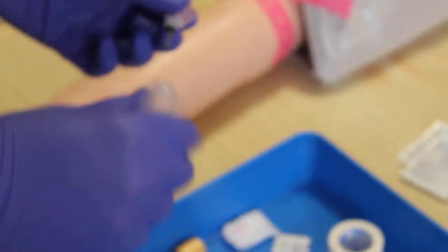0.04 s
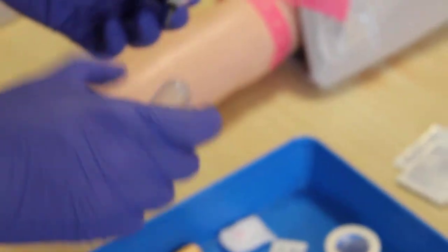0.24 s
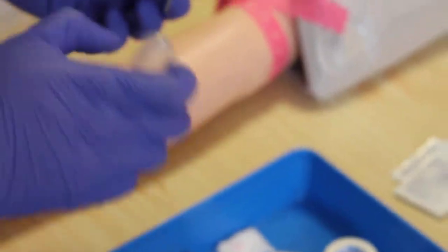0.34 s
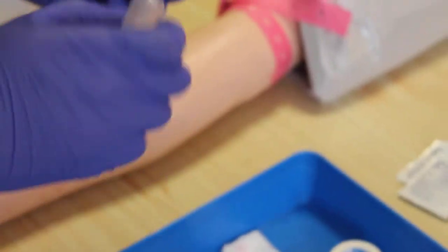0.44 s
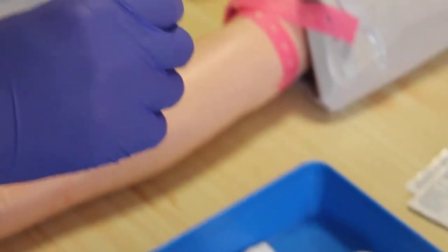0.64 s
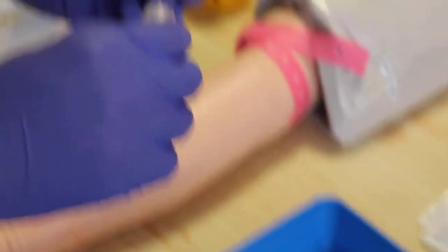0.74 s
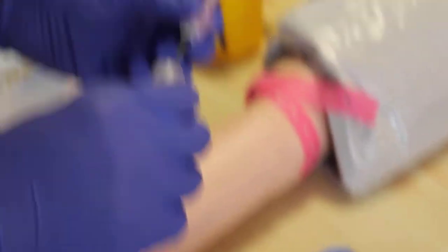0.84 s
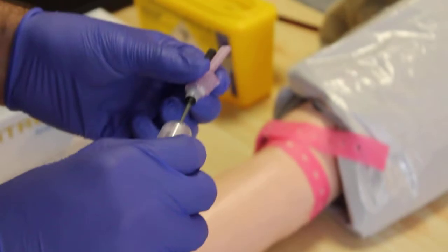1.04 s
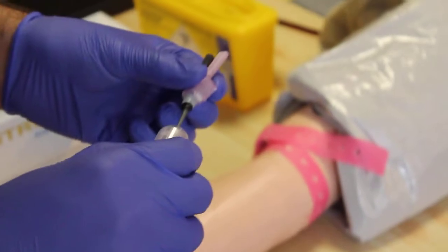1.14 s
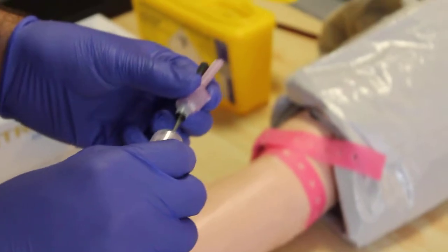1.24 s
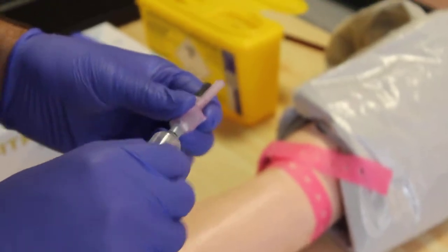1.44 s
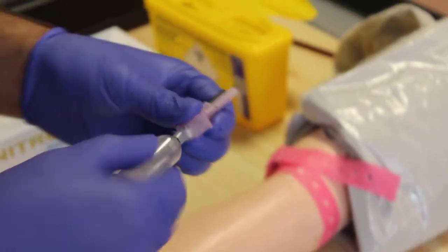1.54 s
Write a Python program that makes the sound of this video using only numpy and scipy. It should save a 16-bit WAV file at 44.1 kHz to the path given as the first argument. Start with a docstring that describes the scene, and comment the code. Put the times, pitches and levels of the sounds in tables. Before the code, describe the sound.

A small plastic needle cap clatters and bounces to rest in a plastic tray indoors

```python
"""Ventilation hums and rushes throughout: steady sine tones over coloured noise.
From 0.23 s a plastic needle cap bounces to rest in a plastic tray, landing on one end and then the other;
each landing is a sharp pulse, fading sine tones and a noisy crack. Faint glove brushes of noise fall among them.
At 1.39 s the needle holder gives a double click, then a fainter one, and its hollow tube rings.
At 1.52 s the glove brushes once more. A small room adds echoes and a soft tail of fading noise."""
import sys
import numpy as np
from scipy import signal
from scipy.fft import rfft, irfft
from scipy.io import wavfile

SR = 44100
rng = np.random.default_rng(int(sys.argv[2]) if len(sys.argv) > 2 else 0)


def master_out(mix):
    """Clip the mix to full scale and print it as 16-bit PCM to the path in sys.argv[1]."""
    frames = np.transpose(np.atleast_2d(mix))
    ceiling = np.clip(frames, -1, 1)
    pcm = np.round(ceiling * 32767).astype(np.int16)
    wavfile.write(sys.argv[1], SR, pcm)


N = 70560   # length in samples: 1.6 s

# Ventilation motor tones: f/Hz, level/dB rms
HUM_TONES = [(100, -80.5), (199.5, -73), (300.5, -69.5), (399.9, -59.5), (500, -70.5)]
# Colour of the rushing air, relative: f/Hz, level/dB per Hz
AIR_COLOUR = [(22, -21.5), (50, -14), (90, -8), (135, 2), (230, -1.17), (350, -3), (600, -11), (1000, -12),
              (2000, -16.5), (4000, -20.8), (8000, -24.5), (13000, -32)]
# Echoes off nearby surfaces: delay t/s, level/dB
NEARBY_ECHOES = [(.0016, -25), (.0059, -13.5), (0.0108, -15.5), (0.038, -34.5)]
# Colour of the room's tail: f/Hz, level/dB
ROOM_COLOUR = [(100, -10), (230, 0), (500, -3.5), (950, -4), (1600, -5.5), (2800, -11), (5000, -10),
               (9000, -12.5), (16000, -8)]
# How long the room's tail takes to fall by 60 dB: f/Hz, t60/s
ROOM_FADE = [(150, 0.16), (800, .29), (1700, .38), (3000, 0.42), (7000, 0.36), (16000, 0.36)]
# Low tones at which the room itself rings: f/Hz, level/dB, t60/s
ROOM_TONES = [(211, -56, .2), (405, -55, 0.26), (730, -62, 0.13)]
# Glove brushes on plastic: start t/s, level/dB, release time constant/s
GLOVE_BRUSHES = [(.370, -51, .002), (0.377, -33, 0.0024), (0.386, -52, .004), (1.522, -57, .05)]
# Colour of the brushing, relative: f/Hz, level/dB
BRUSH_COLOUR = [(1000, -1), (4000, -1), (8300, 14.5), (10500, 3), (16000, 2)]
# Holder clicks: t/s, level/dB, extra level of the tube's ring/dB
HOLDER_CLICKS = [(1.3909, -35.5, -7), (1.3959, -32.5, 3.5), (1.4337, -52.5, 9)]
# Tones of the holder's wall: f/Hz, level/dB, t60/s
HOLDER_TONES = [(1332, -21, 0.027), (2350, -5, 0.0071), (3560, -35, 0.0096), (11200, -26, 0.016)]
# Colour of the click's noisy crack: f/Hz, level/dB
CLICK_CRACK = [(200, -37), (1000, 11.5), (2500, 24), (6000, 11.5), (16000, 2)]
# Cap landings: t/s, level/dB, then the colour given by the point of contact:
# six boosts or cuts/dB, one at each of COLOUR_CENTRES, and one/dB above COLOUR_TOP_HZ
LANDINGS = [(0.2307, 8, -7, 10, -0.5, -2.5, 3, -6, -1), (.2442, 5.5, -6.5, -12, 4, -2.5, -5, 10.5, -6.5),
            (0.4028, 1, 1, 3.5, -6, 12.5, -28.5, 17, -7.5), (0.4041, -5, -15, -1, 12, 6.5, -17, -3, -4),
            (0.4248, -2.5, 2, 3.5, 5, 4.5, -1.5, 10, -23), (0.4922, -14.5, 3, -14, -2, 3, -9, 3, 11),
            (0.4971, -5, 3.5, 2.5, 4, 3.5, 1, 3.5, -8.5), (0.5507, -13.5, -4.5, 9, 0, 6, 2, -6, -10),
            (.5620, -11.5, 2, 0, 2.5, 3, -12, 1, -24), (.5930, -24.5, 11, -2, 2.5, 9, 2, -8, 0),
            (0.719, -30.5, 1, 4, -14.5, -4, -5.5, -0.5, -31), (.8070, -29, 5, 9.5, -12, -2, -4, 5.5, -23)]
# Centres of the six colour regions: f/Hz
COLOUR_CENTRES = (930, 1735, 3063, 4850, 6200, 6760)
# Tones of the tray: f/Hz, level/dB, t60/s
TRAY_TONES = [(236, -44.5, 0.096), (409.6, -42.5, 0.084), (560, -48.5, 0.018), (886, -41, .025),
              (1250, -45, .035), (1411.5, -28, 0.022), (1440, -31, 0.15), (1648, -35.5, .04),
              (1760, -34, 0.0067), (2316, -22, .018), (2535, -16, 0.0075)]
# Tones of the cap: f/Hz, level/dB, t60/s
CAP_TONES = [(3028, -23.5, 0.014), (3690, -37.5, 0.0027), (4860, -24.5, 0.01), (5480, -34, 0.0025),
             (6620, -33.5, 0.0039), (7960, -31.5, 0.018)]
# Crowded, quickly fading tones of cap and tray together, made as noise: f/Hz, level/dB
LANDING_CRACK = [(100, -16.5), (400, -1), (900, 4), (1500, 8.5), (2800, 11.5), (5000, 1.5), (7500, 1),
                 (10500, -12.5), (16000, -8)]
# How long the cracks of landings and clicks take to fall by 60 dB: f/Hz, t60/s
CRACK_FADE = [(200, .02), (1500, 0.027), (4000, 0.014), (8000, .008), (16000, 0.0024)]

AIR_DB = -58   # rms level
ROOM_BUILD_S = 0.008   # the room's tail swells in
ROOM_COLOUR_SHARE = 0.49   # heard from all sides, the landings differ less
HANDS_ROOM_DB = -5   # the hands are nearer than the tray, so drier
BRUSH_ATTACK_S = 0.0046
TUBE_HZ, TUBE_DB, TUBE_T60_S = 1508, -2, 0.058
COLOUR_Q, COLOUR_TOP_HZ = 1.8, 9600
SNAP_DB, SNAP_LOW_HZ, SNAP_HIGH_HZ, SNAP_TOP_HZ = 9.5, 1660, 3500, 8400   # the contact's pressure pulse
RADIATION_HZ = 163   # small plastic parts give off little sound below this
RING_S = 0.4   # length of each ring, crack and room tail
BAND_EDGES_HZ = np.geomspace(70, 18000, 17)   # 16 bands, half an octave each
OVERLOAD, CUTOFF_HZ = 0.72, 15900
TINY = 1e-18   # inaudible offset on the filter inputs


def amp(db):
    """Turn decibels into a gain."""
    return 10 ** (np.asarray(db) / 20)


def at_hz(points, hz):
    """Read a table between its points, on a log-frequency axis."""
    f, value = np.transpose(points)
    return np.interp(np.log(np.maximum(hz, 1)), np.log(f), value)


def seconds(length_s=N / SR):
    """Give the time of every sample."""
    return np.arange(round(length_s * SR)) / SR


def later(x, s):
    """Place a sound s seconds into the scene."""
    silence = np.zeros(max(int(s * SR), 0))
    return np.concatenate([silence, x, np.zeros(N)])[:N]


def fade(t, t60):
    """Die away steadily, by 60 dB every t60 seconds, down to -240 dB."""
    return amp(np.maximum(-60 * t / t60, -240))


def filtered(x, order, hz, kind):
    """Keep only the highs, the lows or a band of a sound."""
    return signal.sosfilt(signal.butter(order, hz, kind, fs=SR, output="sos"), x)


def noise(colour):
    """Shape steady noise to a colour, at rms 1."""
    hz = np.arange(N // 2 + 1) * SR / N
    spectrum = rfft(rng.standard_normal(N)) * amp(at_hz(colour, hz))
    x = irfft(spectrum, N)
    return x / x.std()


def dying_noise(colour, t60s, build_s=0, count=1):
    """Make several bursts from half-octave noise bands, each band with its own energy and fade."""
    t, out = seconds(RING_S), 0
    swell = 1 - np.exp(-(t / (build_s + 1e-9)) ** 2)
    white = rng.standard_normal((2, count, len(t)))   # neighbouring bands use different noise
    for k, (low, high) in enumerate(zip(BAND_EDGES_HZ, BAND_EDGES_HZ[1:])):
        hz = np.sqrt(low * high)
        burst = white[k % 2] * swell * fade(t, at_hz(t60s, hz))
        band = filtered(burst, 2, [low, high], "band")
        energy = np.sum(band ** 2, axis=1, keepdims=True)
        # wider bands get more energy
        out = out + band * amp(at_hz(colour, hz)) * np.sqrt(2 * (high - low) / SR / energy)
    return out


def ring(tones):
    """Add fading sine tones set off by one blow, neighbours starting in opposite directions."""
    t, out = seconds(RING_S), 0
    for k, (hz, db, t60) in enumerate(tones):
        out = out + (-1) ** k * amp(db) * np.sin(2 * np.pi * hz * t) * fade(t, t60)
    return out


def bell(x, hz, db):
    """Raise or lower a broad region around hz."""
    a, w = amp(db / 2), 2 * np.pi * hz / SR
    k = np.sin(w) / (2 * COLOUR_Q)
    top = [1 + k * a, -2 * np.cos(w), 1 - k * a]
    bottom = [1 + k / a, -2 * np.cos(w), 1 - k / a]
    return signal.lfilter(top, bottom, x + TINY)


def shelf(x, hz, db):
    """Raise or lower everything above hz."""
    w, g = 2 * SR * np.tan(np.pi * hz / SR), amp(db / 4)
    top = [g * g, np.sqrt(2) * w * g, w * w]
    bottom = [1 / g / g, np.sqrt(2) * w / g, w * w]
    return signal.lfilter(*signal.bilinear(top, bottom, SR), x + TINY)


def ventilation():
    """Motor hum, a row of steady sine tones, on a soft rush of air, which is coloured noise."""
    hum = np.zeros(N)
    for hz, db in HUM_TONES:
        turns = hz * seconds() + rng.random()
        hum += amp(db) * np.sqrt(2) * np.sin(2 * np.pi * turns)   # root 2 turns rms into peak
    return hum + amp(AIR_DB) * noise(AIR_COLOUR)


def room(hands):
    """Sound leaves in several directions, each returning as its own tail; a few low tones ring along."""
    tails = dying_noise(ROOM_COLOUR, ROOM_FADE, ROOM_BUILD_S, count=4)
    sources = [bouncing_cap(ROOM_COLOUR_SHARE) + amp(HANDS_ROOM_DB) * hands for _ in tails]
    wash = sum(signal.fftconvolve(source, tail)[:N] for source, tail in zip(sources, tails))
    low_ring = signal.fftconvolve(sources[0], ring(ROOM_TONES))[:N]
    return wash / np.sqrt(len(tails)) + low_ring


def glove_brush():
    """Glove rubbing plastic: faint, bright noise that rises quickly and dies away."""
    t, loudness = seconds(), np.zeros(N)
    for s, db, release_s in GLOVE_BRUSHES:
        brush = np.minimum(t / BRUSH_ATTACK_S, 1) * np.exp(-t / release_s)
        loudness += amp(db) * later(brush, s)
    return noise(BRUSH_COLOUR) * loudness


def holder_clicks():
    """Small snaps set the holder's wall and the air in its tube ringing, each with a noisy crack."""
    out, wall = np.zeros(N), ring(HOLDER_TONES)
    tube = ring([(TUBE_HZ, TUBE_DB, TUBE_T60_S)])
    cracks = dying_noise(CLICK_CRACK, CRACK_FADE, count=len(HOLDER_CLICKS))
    for (s, db, tube_db), crack in zip(HOLDER_CLICKS, cracks):
        out += amp(db) * later(wall + amp(tube_db) * tube + crack, s)
    return out


def snap():
    """The pressure pulse of the contact itself: sharp, thin in the bass and softened at the top."""
    pulse = signal.unit_impulse(round(RING_S * SR)) + TINY
    pulse = filtered(pulse, 2, SNAP_LOW_HZ, "high")
    pulse = filtered(pulse, 1, SNAP_HIGH_HZ, "low")
    pulse = filtered(pulse, 1, SNAP_TOP_HZ, "low")
    return amp(SNAP_DB) * pulse


def bouncing_cap(colour_share=1):
    """Each landing snaps, cracks and rings cap and tray; the point of contact colours it."""
    out, body = np.zeros(N), snap() + ring(TRAY_TONES + CAP_TONES)
    cracks = dying_noise(LANDING_CRACK, CRACK_FADE, count=len(LANDINGS))
    for (s, db, *colour, top_db), crack in zip(LANDINGS, cracks):
        hit = body + crack
        for hz, colour_db in zip(COLOUR_CENTRES, colour):
            hit = bell(hit, hz, colour_share * colour_db)
        hit = shelf(hit, COLOUR_TOP_HZ, colour_share * top_db)
        out += amp(db) * later(hit, s)
    return filtered(out + TINY, 2, RADIATION_HZ, "high")


def scene():
    """Cap, holder and glove with their echoes and the room, over the ventilation."""
    hands = holder_clicks() + glove_brush()
    direct = bouncing_cap() + hands
    echoes = sum(amp(db) * later(direct, s) for s, db in NEARBY_ECHOES)
    return (direct + echoes + room(hands) + ventilation())[None]


def record(dry):
    """The microphone overloads, flattening peaks beyond its limit; then the top is cut."""
    clipped = np.clip(dry, -OVERLOAD, OVERLOAD)
    top_cut = signal.ellip(10, 0.1, 80, CUTOFF_HZ, fs=SR, output="sos")   # 0.1 dB ripple, 80 dB cut
    return signal.sosfilt(top_cut, clipped)


dry = scene()
out = record(dry)
master_out(out)
```